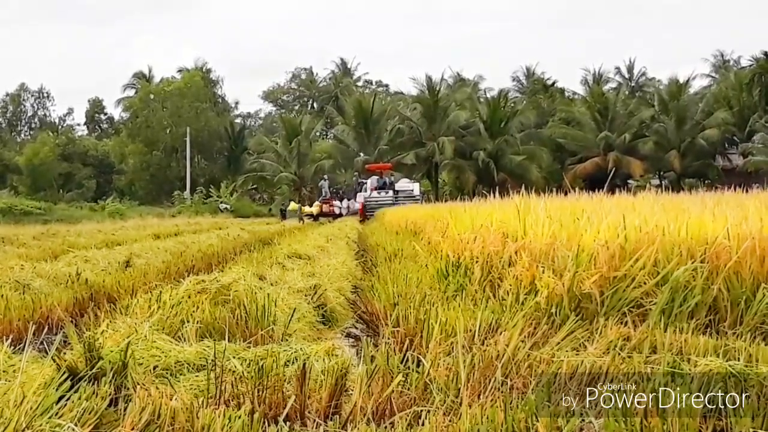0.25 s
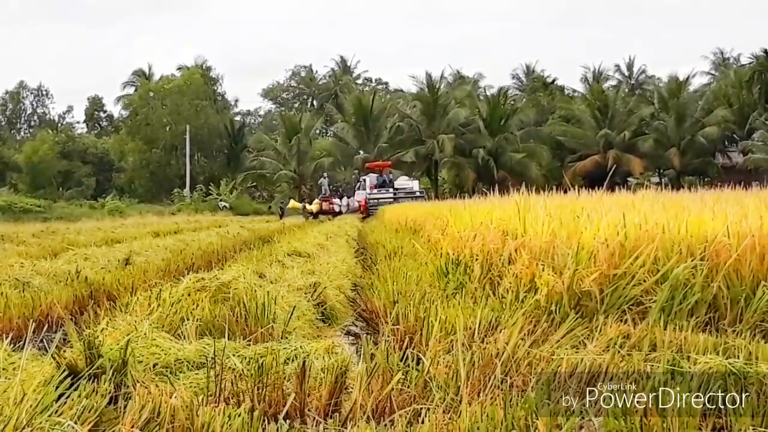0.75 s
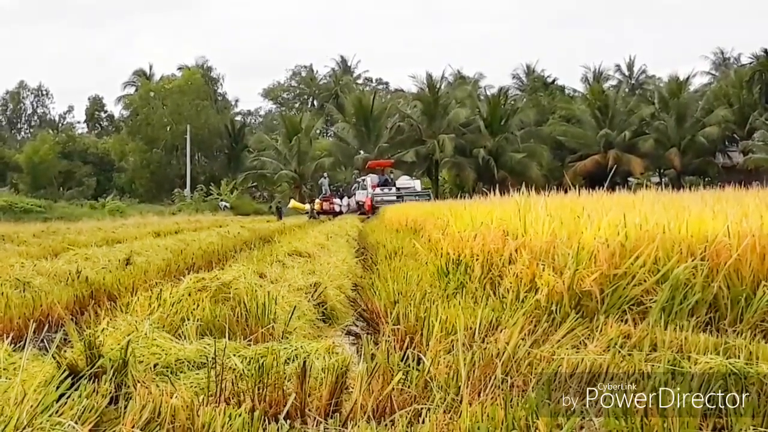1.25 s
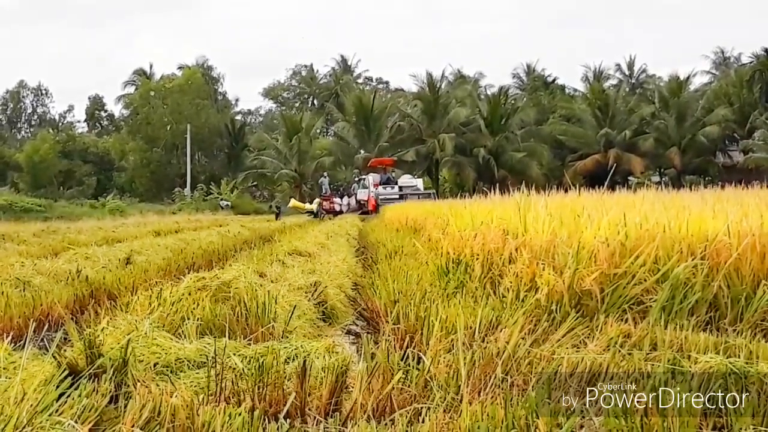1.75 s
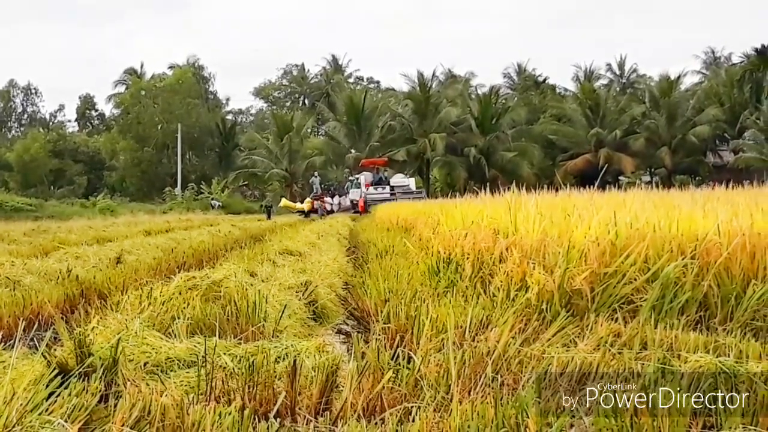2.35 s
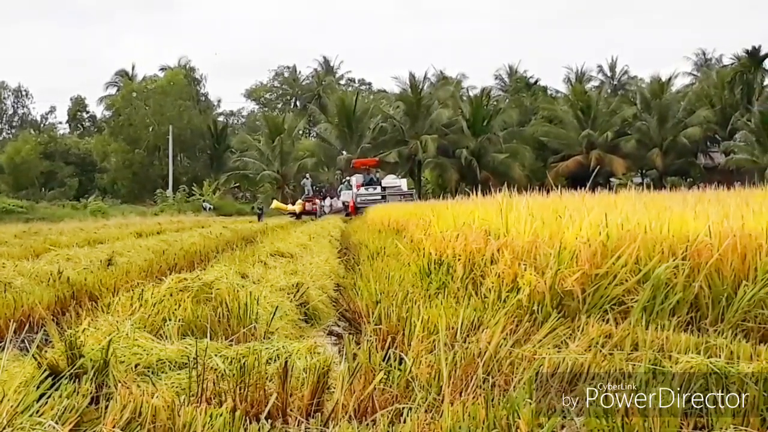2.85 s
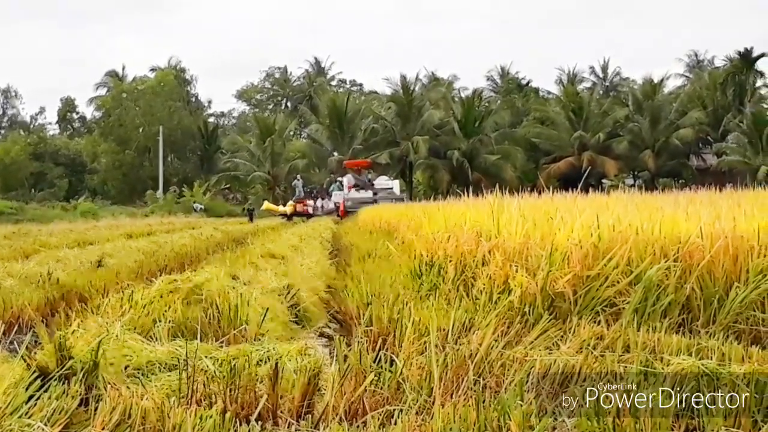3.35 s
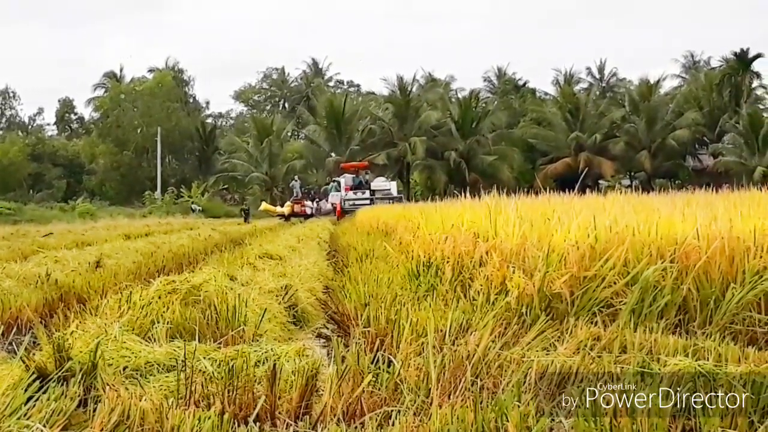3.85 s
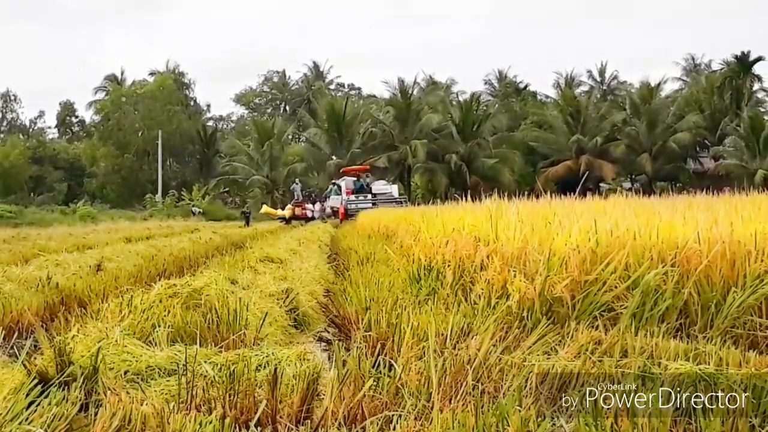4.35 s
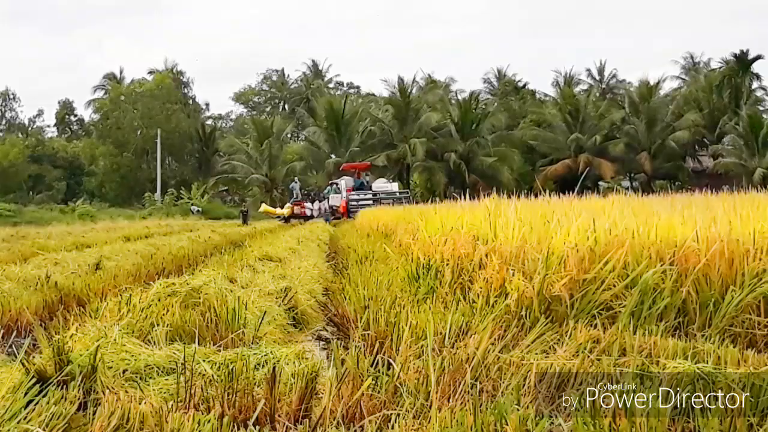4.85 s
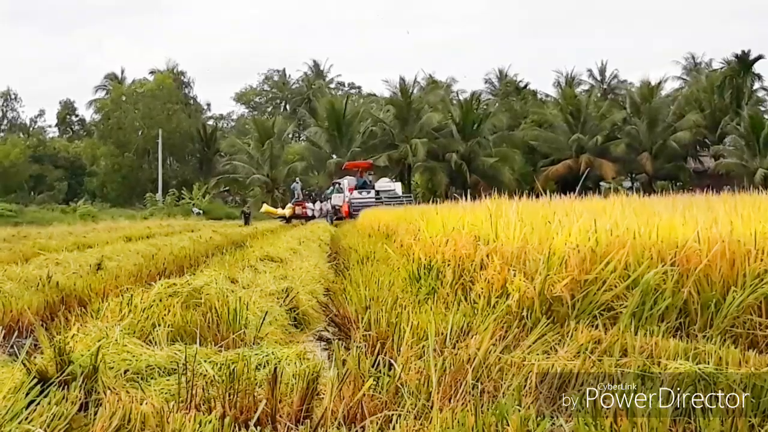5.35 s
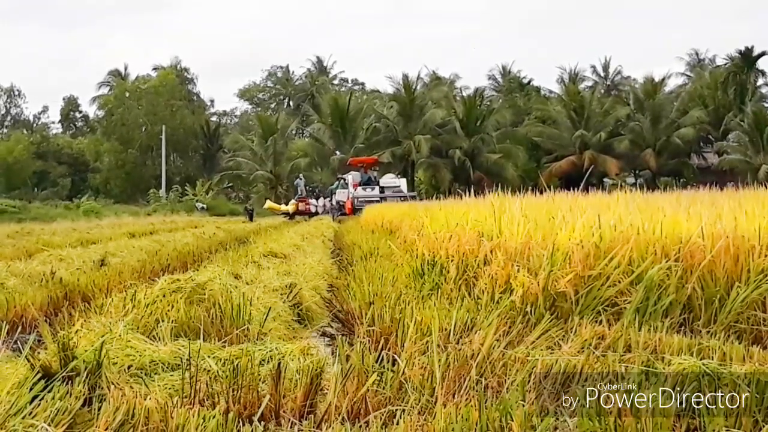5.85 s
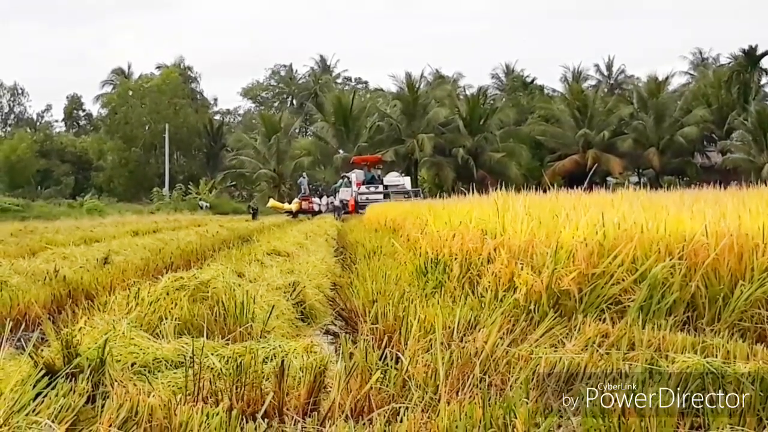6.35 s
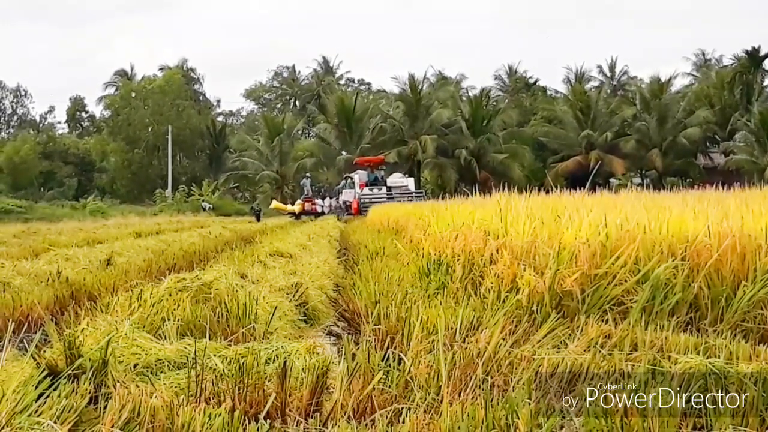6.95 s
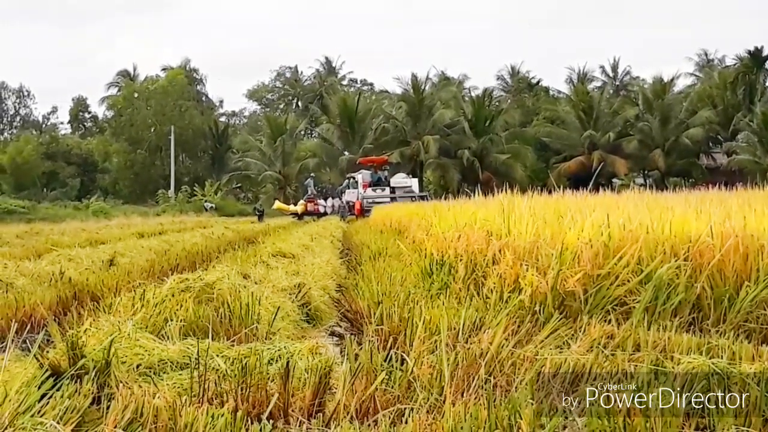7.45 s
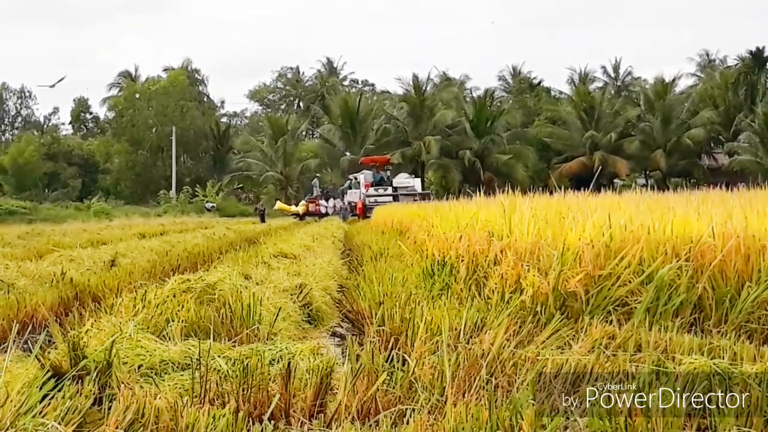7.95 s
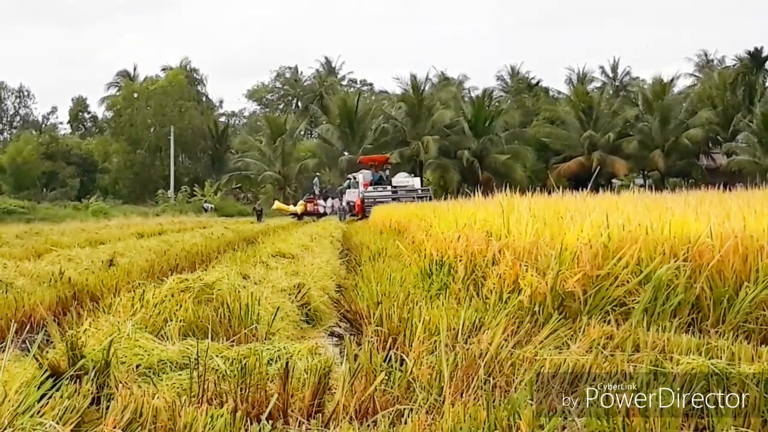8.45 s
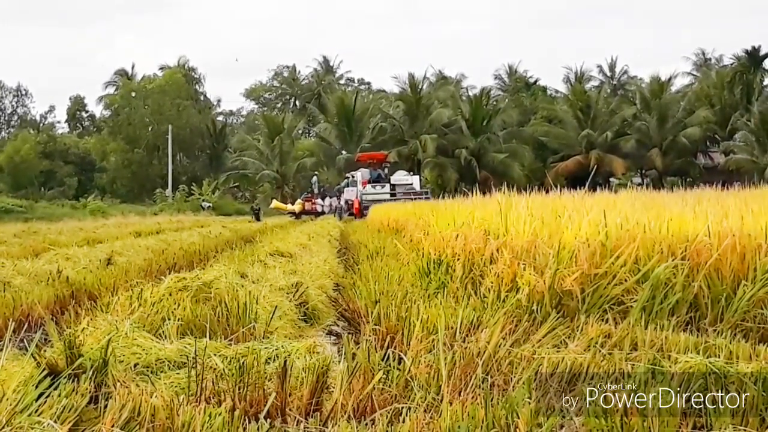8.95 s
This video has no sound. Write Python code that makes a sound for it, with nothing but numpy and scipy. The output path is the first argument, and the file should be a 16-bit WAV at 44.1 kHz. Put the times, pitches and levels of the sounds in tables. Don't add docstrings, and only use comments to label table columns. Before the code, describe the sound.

Outdoors in an open rice field, harvester diesels drone far off at nearly matching speeds, their low notes slowly beating. Muffled exhaust roar, faint chain rattle and threshing hiss run throughout. Around three seconds another engine briefly revs up; very high, thin swift squeaks pass overhead then and again near six. Dry straw rustles softly near the single microphone.

```python
import sys
import numpy as np
from scipy import signal
from scipy.fft import rfft, irfft, next_fast_len
from scipy.io import wavfile
from scipy.ndimage import uniform_filter1d, map_coordinates

SR = 44100
rng = np.random.default_rng(int(sys.argv[2]) if len(sys.argv) > 2 else 0)


def magnitude_from_level(level_db):
    exponent = np.asarray(level_db, float) / 20
    return 10 ** exponent


def wav_out(sig):
    wavfile.write(sys.argv[1], SR, np.round(np.clip(np.atleast_2d(sig).T, -1, 1) * 32767).astype(np.int16))


N = 406161

# time in seconds, firing rate in Hz.
LOADED_SPEED = [(0, 95.2), (1.5, 94.9), (1.9, 93.9), (2.5, 94.5), (3, 94.2), (3.7, 94.8), (4.4, 94.5),
                (4.7, 93.5), (5.15, 93.1), (5.75, 94.8), (6.4, 94.8), (6.8, 96.4), (7.2, 96.4), (7.5, 95.6),
                (8.1, 95.9), (8.7, 95.4), (9.21, 95.8)]
# time in seconds, note (2nd order) in dB, 1st order over the note in dB.
LOADED_EXHAUST = [(0, -33.5, -17), (.7, -36.5, -4), (1.3, -32.5, -1.5), (2, -27, -3.5), (2.4, -31, 1),
                  (3, -26.5, -7.5), (3.6, -26.5, -10), (4.1, -24, -5), (4.5, -27, 0.5), (4.8, -20, -6.5),
                  (5.25, -19.5, -7.5), (5.85, -31.5, 3), (6.4, -35, -6), (6.7, -50, 8), (7.2, -46, 10),
                  (7.65, -29, -13), (8.4, -43, -4), (8.9, -25, -12)]
# time in seconds, gain in dB.
SLOWER_DRUM = [(0, 0), (2, -2.5), (3.6, -8), (4, -2), (5.9, -5.5), (6.3, 3.5), (7.6, -6), (8, 1),
               (9.21, 1.5)]
# time in seconds, firing rate in Hz, note in dB.
REVVING = [
    (2.9, 38, -60),
    (3.07, 41, -31),
    (3.2, 48, -34),
    (3.35, 62, -27.5),
    (3.5, 76, -23),
    (3.6, 85, -26),
    (3.7, 92, -29),
    (3.85, 95, -60),
]
# time in seconds, firing rate in Hz, note in dB.
SETTLED = [
    (5.8, 91.6, -60),
    (6, 91.6, -37),
    (6.7, 91.9, -29),
    (7.5, 91.3, -29.5),
    (8, 90.7, -35),
    (8.25, 91, -46),
    (8.7, 91, -32),
    (9.21, 90.8, -42),
]
# time in seconds, load of the drum in dB, breeze towards the microphone in dB.
FIELD = [(0, 2, -0.5), (.5, 1.5, 1.5), (1.1, 0, 2.5), (1.7, -0.5, .5), (2.4, 1, 0.5), (3, 0, -0.5),
         (3.5, 2.5, -1), (4, 1, -0.5), (4.6, 1, 1), (5.1, 1, 1.5), (5.5, 1.5, 1), (6.2, 0, 1),
         (6.9, 1.5, 1), (7.19, -3, 0), (7.6, 2.5, -0.5), (7.85, 1, 0), (8.7, 0, .5), (9.21, -1, 1)]
# frequency in Hz, level in dB per Hz.
DEEP_COLOUR = [(13, -65), (25, -37), (50, -24), (70, -13), (85, -7), (105, -5), (130, -3), (158, 0),
               (180, -3), (200, -6), (235, -12), (310, -40), (530, -120)]
# frequency in Hz, level in dB per Hz.
UPPER_COLOUR = [(120, -17), (200, -7), (220, -7), (312, -8), (349, -8), (475, -13), (566, -20),
                (604, -32.5), (680, -32.5), (880, -58), (1500, -120)]
# frequency in Hz, level in dB per Hz.
RATTLE_COLOUR = [(360, -31), (620, -10.5), (674, -4.5), (773, -1), (936, -5), (1180, -3), (1460, -10.5),
                 (1610, -6.5), (1900, -9.5), (2000, -12), (2600, -37), (4400, -120)]
# frequency in Hz, level in dB per Hz.
HISS_COLOUR = [(1120, -16), (1900, -10), (2160, -2), (2490, -4.5), (2810, 0), (3340, 0.5), (4110, -2),
               (4470, -7), (5200, -17.5), (6760, -16), (11400, -120)]
# start in seconds, length in seconds, from Hz, to Hz, peak in dB.
SQUEAKS = [(3.512, .11, 15200, 11750, -61), (3.225, .025, 12900, 13700, -62),
           (3.258, .075, 11350, 12500, -56), (3.26, .07, 13200, 14100, -64),
           (3.315, 0.076, 11800, 12200, -60), (3.375, .07, 12750, 12950, -53),
           (3.42, .032, 12900, 12450, -55), (3.378, .05, 13000, 13300, -59),
           (3.45, .035, 13150, 13800, -61), (3.485, .032, 13550, 13700, -57),
           (3.462, .036, 12100, 11650, -52), (3.515, .035, 11250, 10750, -62),
           (3.535, .06, 14450, 12550, -51), (4.07, .105, 4250, 5350, -48.5),
           (6.015, .055, 11800, 14650, -53), (6.065, .035, 13400, 14100, -55),
           (6.09, .09, 13600, 13200, -64), (6.075, .085, 11350, 11900, -60), (6.14, .04, 11950, 11250, -58),
           (6.17, .07, 11350, 11150, -63), (6.16, .075, 14400, 13900, -59),
           (6.205, .085, 14200, 11950, -59), (6.27, .045, 12100, 11900, -60),
           (6.305, .05, 11950, 11000, -64)]
# middle in seconds, length in seconds, pitch in Hz, peak in dB.
RASPS = [(3.25, .16, 13400, -65), (3.33, .16, 12900, -61), (3.46, .2, 13200, -59), (3.56, .14, 13400, -68),
         (4.87, .12, 12200, -64), (5, .12, 12400, -61), (5.07, .08, 12200, -63), (5.19, .12, 12400, -64),
         (5.41, .14, 12200, -65), (5.55, .18, 12300, -64), (6.09, .2, 13700, -68), (6.27, .22, 13600, -65),
         (6.775, .28, 13450, -54), (6.76, .5, 12000, -63)]
# middle in seconds, length in seconds, gain in dB.
PUFFS = [(0.042, 0.041, 1), (.09, 0.044, 3), (.14, 0.046, 2), (.3, .1, 0), (.65, 0.053, 4), (0.772, .04, 4),
         (.83, .04, 5), (1.2, .5, 0), (1.68, .08, 3), (2.15, 0.27, 1), (2.903, 0.34, 3), (3.4, .5, 1),
         (3.98, .2, 1), (4.9, .12, 1), (4.997, .06, 2), (5.08, .05, 5), (5.2, .07, 1), (5.4, .08, 4),
         (5.6, .4, 1), (6.15, .5, 1), (6.78, .4, 2), (7.5, .5, 2), (9.15, 0.86, 2.5)]
# frequency in Hz, level in dB per Hz.
CHAFF_COLOUR = [(2820, -36), (4800, -1), (7020, -6), (8500, -2), (8880, -2.5), (9600, -19), (12500, -42),
                (21100, -120)]
# frequency in Hz, level in dB per Hz.
STRAW_COLOUR = [(8800, -30), (9400, -6), (9800, -8), (10700, -5), (11500, -9), (12200, -4.5),
                (13000, -10.5), (14100, -7), (14700, -13), (15400, -14)]

TIME = np.arange(N) / SR


def unit(x):
    return x / np.sqrt(np.mean(x ** 2) + 1e-20)


def curves(rows):
    s, *columns = np.transpose(rows)
    return [np.interp(TIME, s, column) for column in columns]


def wobble(rate):
    knots = rng.standard_normal(int(N * rate / SR) + 4)
    return map_coordinates(knots, [np.arange(N) * rate / SR])


def swell(start, attack, hold, release, gain_db):
    corners = np.cumsum([start, attack, hold, release])
    return np.interp(TIME, corners, [0, gain_db, gain_db, 0])


def orders(hz, multiples, levels_db, slip, flutter_db):
    turns = 2 * np.pi * np.cumsum(hz) / SR
    phase = turns + slip * wobble(9)
    out = np.zeros(N)
    for k, db in zip(multiples, levels_db):
        strength = np.sqrt(2) * magnitude_from_level(db + flutter_db * wobble(7))
        out += strength * np.sin(k * phase + k)
    return out


def rush(colour, patchy_db):
    z = signal.stft(rng.standard_normal(N), nperseg=512)[2]
    patches = uniform_filter1d(rng.standard_normal(z.shape), size=8, axis=0)
    patches = unit(uniform_filter1d(patches, size=8, axis=1))
    x = signal.istft(z * magnitude_from_level(patchy_db * patches), nperseg=512)[1][:N]
    f, level = np.transpose(colour)
    m = next_fast_len(N + 8192)
    bins = np.fft.rfftfreq(m, 1 / SR)
    gain = magnitude_from_level(np.interp(np.log(bins + 1), np.log(f + 1), level, -120, -120))
    return unit(irfft(rfft(x, m) * gain, m)[:N])


def loaded_engine():
    (hz,) = curves(LOADED_SPEED)
    note, first_over_note = curves(LOADED_EXHAUST)
    third = -45.5 + swell(start=3.52, attack=0.63, hold=1.8, release=.4, gain_db=9.9)
    fourth = -53 + 4 * wobble(3)
    return orders(hz, range(1, 5), [note + first_over_note, note, third, fourth], slip=.06, flutter_db=.7)


def slower_engine():
    hz = 86.9 + .35 * wobble(1.5)
    first = -41 + 0.63 * TIME + 0.5 * wobble(2)
    drum = -38 + wobble(2) + curves(SLOWER_DRUM)[0]
    sixth = -55 + 0.14 * TIME + wobble(2)
    return orders(hz, (1, 4, 6), [first, drum, sixth], slip=.04, flutter_db=1.2)


def revving_engine():
    hz, note = curves(REVVING)
    first = note - 9 + .25 * np.minimum(hz - 76, 0)
    return orders(hz, (1, 2, 3), [first, note, note - 15], slip=.04, flutter_db=.6)


def settled_engine():
    hz, note = curves(SETTLED)
    first = -38 + 0.38 * (note + 33)
    out = orders(hz, (1, 2), [first, note], slip=.08, flutter_db=1.2)
    return out * (TIME > SETTLED[0][0])


def gear_whine():
    level = -67 + swell(start=7.8, attack=1.2, hold=1, release=.1, gain_db=11)
    return orders(np.full(N, 634.5), (1,), [level], slip=0.43, flutter_db=4.0)


def roar():
    load = curves(FIELD)[0]
    deep = magnitude_from_level(-29 + 0.2439 * TIME + load) * rush(DEEP_COLOUR, patchy_db=0.34)
    upper = magnitude_from_level(-30 + 0.53 * TIME + 0.65 * load) * rush(UPPER_COLOUR, patchy_db=0.48)
    return deep + upper


def threshing():
    load, breeze = curves(FIELD)
    shake = 0.64 * wobble(28)
    chains = magnitude_from_level(-51.5 + 0.38 * TIME + .2 * load + shake) * rush(RATTLE_COLOUR, patchy_db=0.3)
    hiss = magnitude_from_level(-45.5 + breeze + shake) * rush(HISS_COLOUR, patchy_db=0.38)
    return chains + hiss


def swift_squeaks():
    out = np.zeros(N)
    quaver = 60 * wobble(150)
    for s, length, from_hz, to_hz, db in SQUEAKS:
        u = np.linspace(0, 1, round(length * SR))
        i = round(s * SR) + np.arange(len(u))
        pitch = from_hz + (to_hz - from_hz) * u + quaver[i]
        strength = magnitude_from_level(db - 9 * np.abs(2 * u - 1))
        edge = signal.windows.tukey(len(u), .25)
        out[i] += edge * strength * np.sin(2 * np.pi * np.cumsum(pitch) / SR)
    return out * magnitude_from_level(2.2 * wobble(110))


def swift_rasps():
    out = np.zeros(N)
    grit = unit(uniform_filter1d(wobble(2400), size=56) * magnitude_from_level(1.1 * wobble(90)))
    for middle, length, hz, db in RASPS:
        u = np.linspace(-1, 1, round(length * SR))
        i = round((middle - length / 2) * SR) + np.arange(len(u))
        strength = np.sqrt(2) * magnitude_from_level(db - 18 * np.abs(u))
        out[i] += strength * grit[i] * np.sin(2 * np.pi * hz * i / SR)
    return out


def crop():
    breeze = curves(FIELD)[1]
    puffs = np.zeros(N)
    for middle, length, db in PUFFS:
        puffs += db * np.clip(1 - np.abs(TIME - middle) * 2 / length, 0, 1)
    chaff_db = -53.5 + .3 * breeze + 0.36 * puffs + 0.37 * wobble(20)
    straw_db = -62.5 + .5 * breeze + puffs + .8 * wobble(16)
    chaff = magnitude_from_level(chaff_db) * rush(CHAFF_COLOUR, patchy_db=0.8)
    return chaff + magnitude_from_level(straw_db) * rush(STRAW_COLOUR, patchy_db=1.5)


def scene():
    engines = loaded_engine() + slower_engine() + revving_engine() + settled_engine() + gear_whine()
    machinery = roar() + threshing()
    swifts = swift_squeaks() + swift_rasps()
    return (engines + machinery + swifts + crop())[None]


def roll_off(x):
    return signal.sosfilt(signal.butter(12, 15410, fs=SR, output="sos"), x)


def record(dry):
    top_hz = 15410
    longer = np.concatenate([dry, dry[:, ::-1]], axis=1)
    spectrum = rfft(longer) * (np.fft.rfftfreq(2 * N, 1 / SR) < top_hz)
    mix = irfft(spectrum, 2 * N)[:, :N]
    return roll_off(mix)


dry = scene()
out = record(dry)
wav_out(out)
```